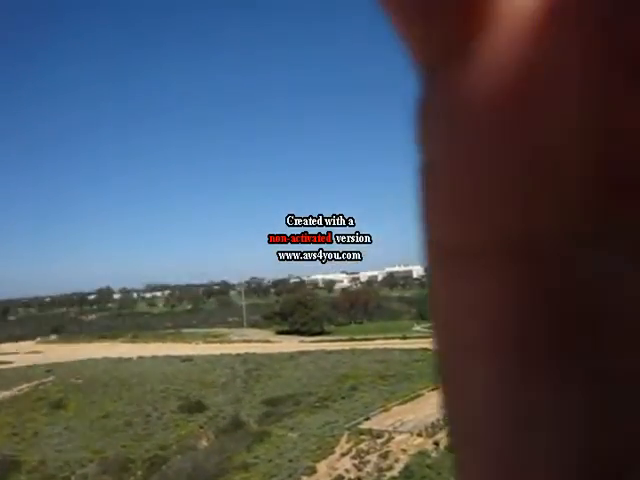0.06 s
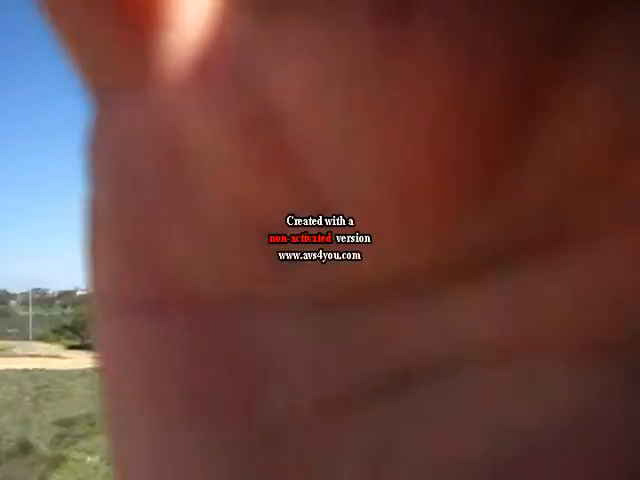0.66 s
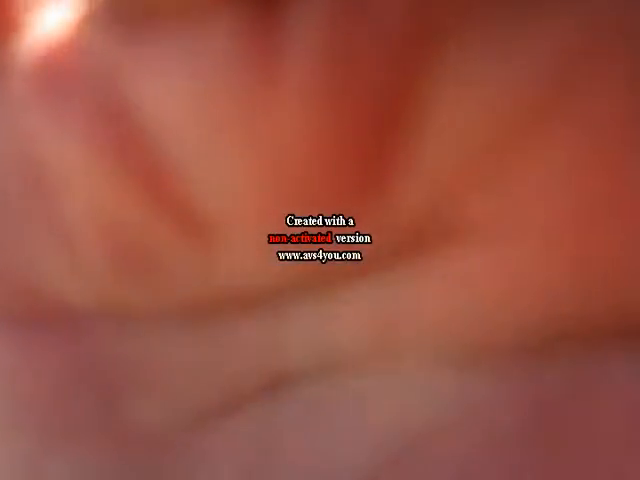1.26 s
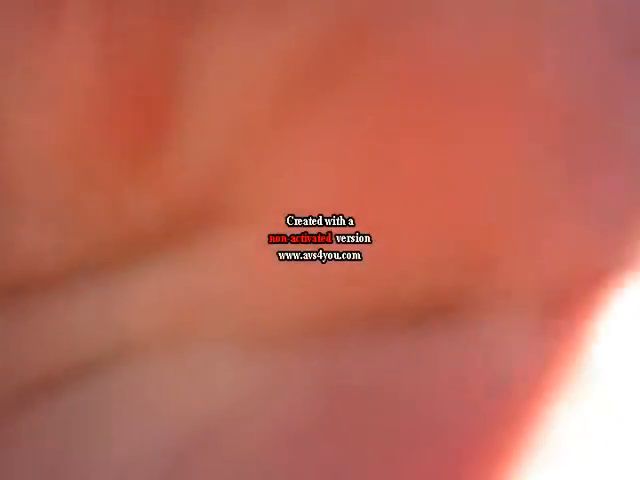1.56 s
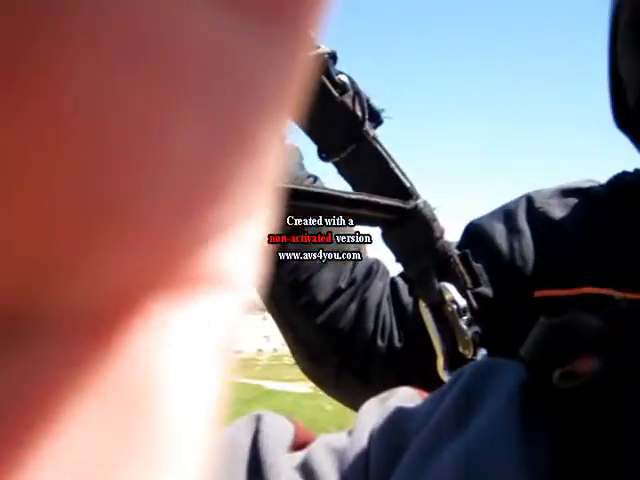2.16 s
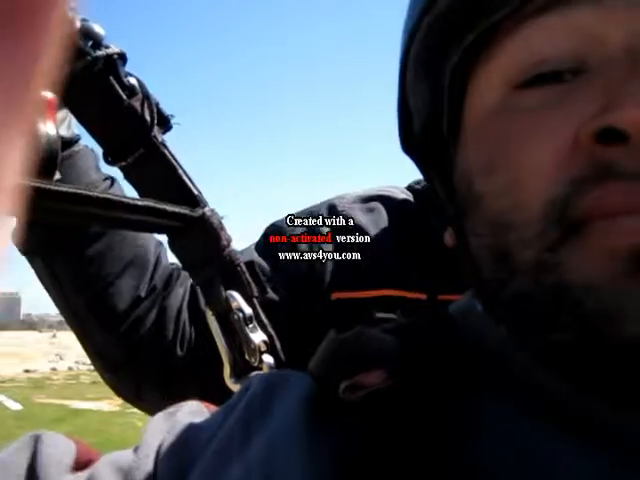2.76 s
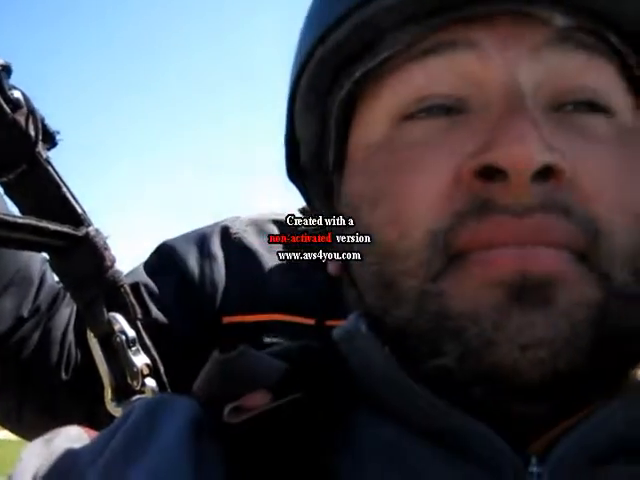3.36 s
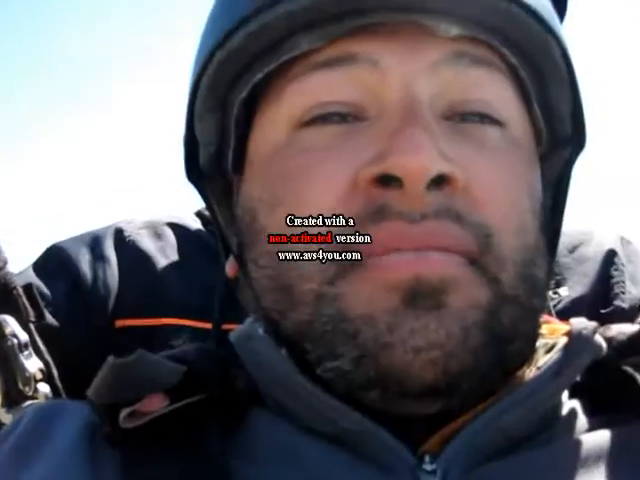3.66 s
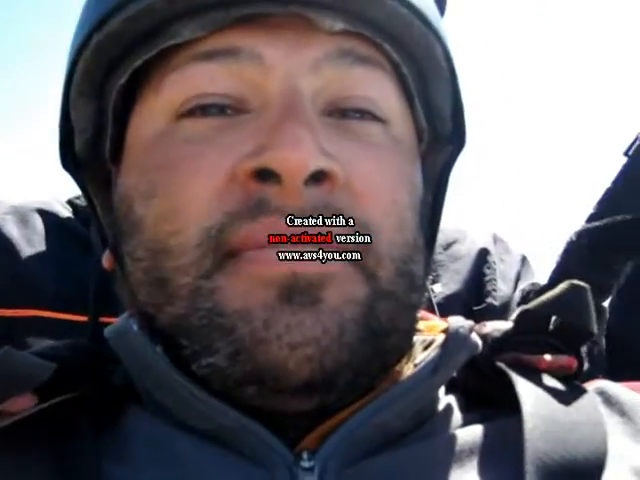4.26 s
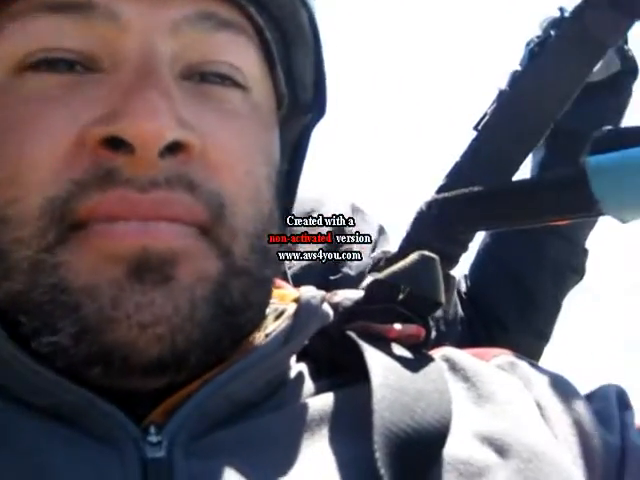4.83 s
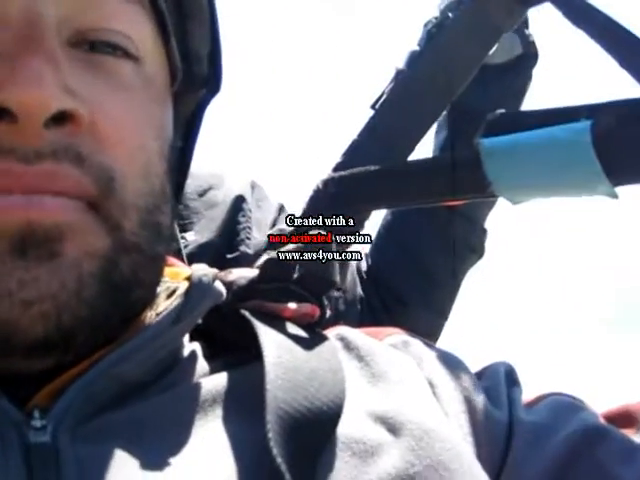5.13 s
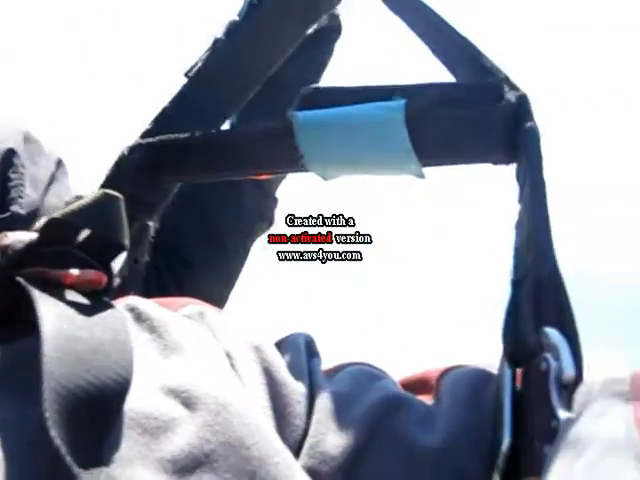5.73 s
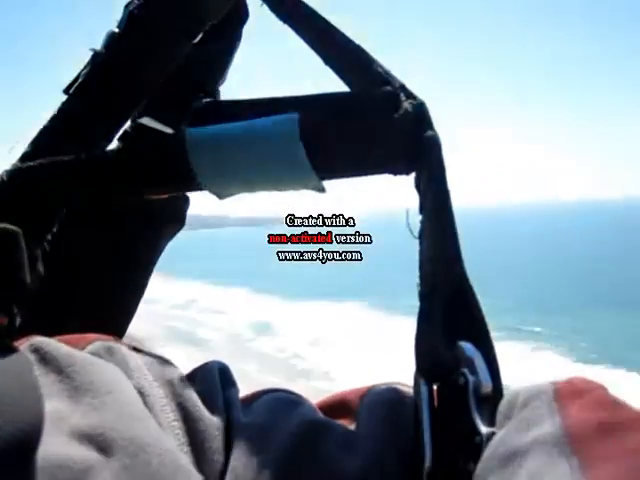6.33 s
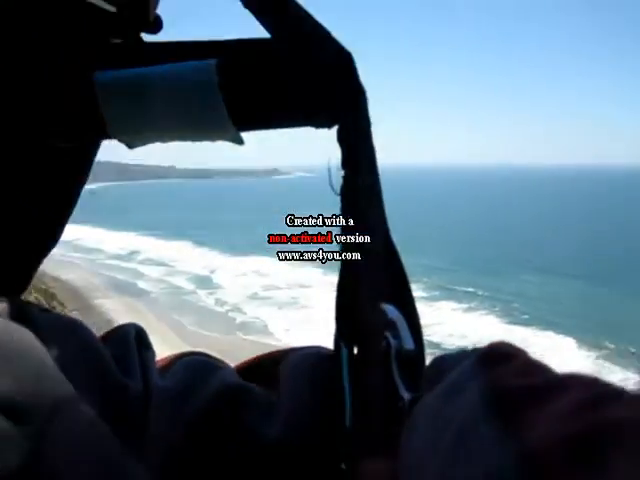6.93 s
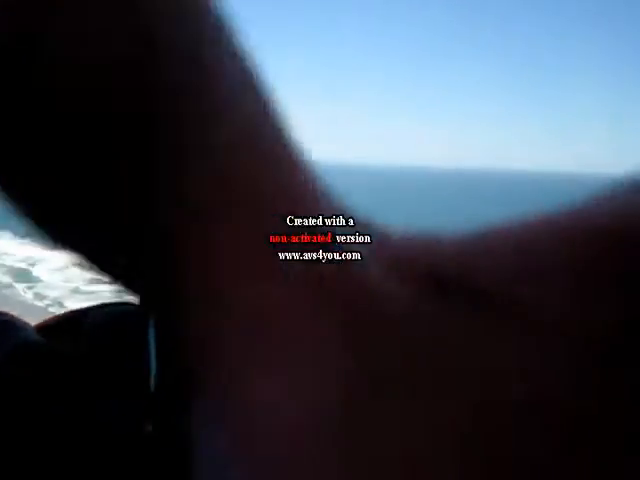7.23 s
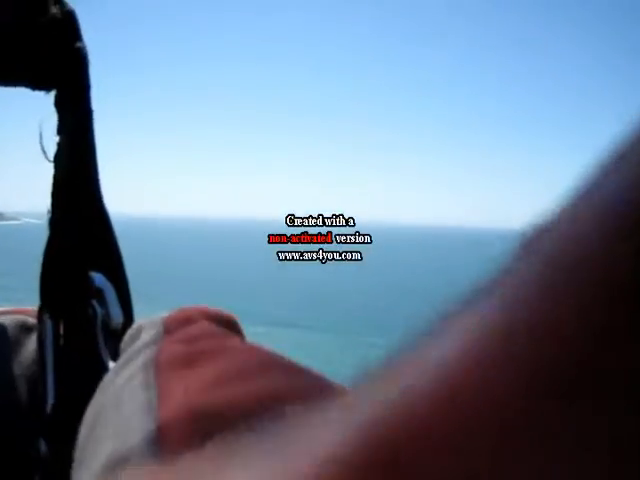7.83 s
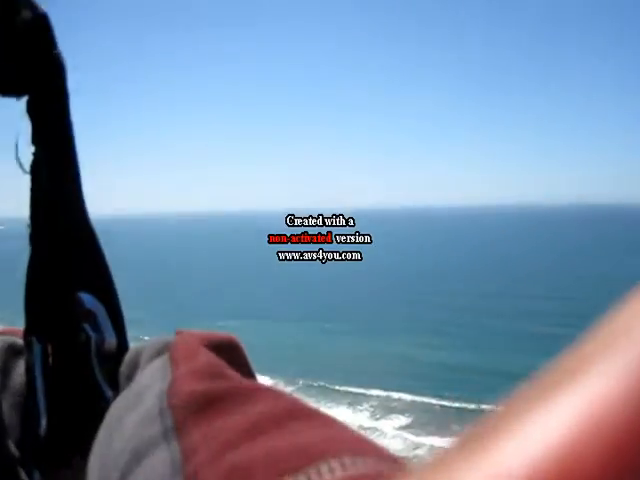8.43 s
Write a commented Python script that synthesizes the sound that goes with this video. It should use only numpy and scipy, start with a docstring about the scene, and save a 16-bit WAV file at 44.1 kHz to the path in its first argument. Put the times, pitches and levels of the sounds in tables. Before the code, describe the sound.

High over the shore, air tears across the microphone of a camera held on a paraglider, roaring, crackling and thumping over a deep rumble. Midway the rush eases into ragged puffs and dull thuds, uncovering a soft airy hiss and two tiny harness clicks. The wind surges, dips and settles back into a solid, even roar. The hardest gusts make the level duck for an instant and rasp slightly.

```python
"""On a paraglider above a coast, wind buffets the microphone of a hand-held camera.
Head-on, air tears across the mic port in a dense roar, and vortex cores crackle and pop in it.
Turned away, the roar breaks into separate gusts over a low buffeting, a smooth hiss of air along the
camera body comes through, and the harness ticks twice. The loudest puffs overload the input:
the level ducks and the peaks rasp faintly."""
import sys
import numpy as np
from scipy import signal
from scipy.fft import rfft, irfft, next_fast_len
from scipy.io import wavfile
from scipy.ndimage import uniform_filter1d

SR = 44100
rng = np.random.default_rng(int(sys.argv[2]) if len(sys.argv) > 2 else 0)


def dump(signal):
    """Clip the signal to [-1, 1] and save it as 16-bit WAV at the path in sys.argv[1]."""
    limited = np.clip(np.atleast_2d(signal).T, -1, 1)
    pcm = np.round(limited * 32767).astype(np.int16)
    wavfile.write(sys.argv[1], SR, pcm)


N = 378819
TIME = np.arange(N) / SR

# Levels are relative: each layer has its own trim. Brightness is treble against body.
# airflow across the port as the camera turns: (time [s], level [dB], brightness [dB])
AIRFLOW = [(0.02, -36.5, -24), (0.06, -21, -16.5), (0.4, -21, -13), (0.52, -18.5, -8.5),
           (0.78, -22.5, -12.5), (1.24, -21, -8.5), (1.35, -23.5, -13), (1.62, -22.5, -12), (2.2, -27, -17),
           (2.55, -29, -15), (2.66, -37.5, -19.5), (3.05, -33, -22.5), (3.74, -30, -24.5),
           (3.83, -43, -10.5), (3.97, -36.5, -17), (5.35, -28, -23), (5.52, -31, -20.5),
           (6.1, -34.5, -20.5), (6.24, -22.5, -9), (6.46, -23.5, -12.5), (6.6, -33.5, -20.5),
           (6.84, -30.5, -13), (6.97, -20.5, -7.5), (8.59, -22, -8)]
# how broken-up the flow is: (time [s], eddy swing [dB])
RAGGEDNESS = [(0, 3.5), (1.3, 2.5), (1.9, 7.5), (2.7, 10), (4.0, 10), (5.2, 7.5), (6.05, 11), (6.3, 5),
              (6.65, 8.5), (7.0, -1), (8.59, 1.5)]
# tone of the turbulence: (frequency [Hz], level [dB])
ROAR_EQ = [(100, -19), (220, -1.5), (400, -1), (650, -3.5), (1000, -8), (1450, -15.5), (2050, -25),
           (2900, -30.5), (3500, -36), (4200, -48.5), (5500, -63), (7000, -83)]
# tone of one vortex core: (frequency [Hz], level [dB])
VORTEX_EQ = [(30, -13.5), (120, 4.5), (500, 0), (1000, -1), (1450, -6), (2050, -18), (2900, -20.5),
             (3600, -27.5), (4300, -35), (5500, -48), (7000, -78.5)]
# faders for the low pressure noise: (time [s], buffeting [dB], deep rumble [dB])
LOW_END_FADERS = [(0.0, -31.5, -31), (0.6, -23, -28.5), (1.7, -23.5, -24), (2.3, -19.5, -23),
                  (3.05, -26, -22), (3.75, -21, -25.5), (4.2, -20, -23), (4.55, -21.5, -28.5),
                  (4.85, -21.5, -22), (5.17, -24, -30), (5.45, -20, -18), (5.7, -18, -29), (6.05, -19, -24),
                  (6.45, -22, -26), (6.78, -16, -29.5), (7.1, -23, -30.5), (8.59, -21.5, -29)]
# tone of the buffeting: (frequency [Hz], level [dB])
BUFFET_EQ = [(40, -33), (75, -6), (105, -2), (170, -4.5), (260, -9), (370, -14.5), (600, -47), (1500, -88)]
# tone of the rumble beneath it: (frequency [Hz], level [dB])
RUMBLE_EQ = [(8, -14), (22, 13), (38, 19), (65, 18.5), (100, 13.5), (250, -61)]
# fader for smooth air along the camera body: (time [s], level [dB])
HISS_FADER = [(0.02, -50), (0.12, -68.5), (1.2, -68), (2.73, -63), (2.79, -52), (3.1, -53), (3.18, -45),
              (3.27, -55.5), (3.38, -49), (3.74, -49.5), (3.88, -58.5), (3.99, -49.5), (4.55, -54.5),
              (4.62, -44), (4.82, -50.5), (5.04, -47.5), (5.46, -49), (5.49, -57.5), (6.55, -65.5),
              (7.1, -64), (8.59, -61)]
# tone of the hiss and ticks, with the recorder's notch at 6.3 kHz and faint treble above it:
# (frequency [Hz], level [dB])
HISS_EQ = [(500, -22.5), (1550, 9.5), (2000, 5), (2850, 11), (4100, 2), (5400, 5), (5800, -5), (6300, -23),
           (7500, -11.5), (9200, -17), (10200, -21), (11300, -21.5), (12300, -31.5)]
# strongest eddies to hit the port: (time [s], nominal length [s], level [dB], brightness [dB])
GUST_CUES = [(0.067, 0.029, -7.5, -11), (0.28, 0.035, -17.5, -6.5), (0.549, 0.046, -20.5, -6.5),
             (1.097, 0.023, -17, -4), (1.201, 0.04, -20.5, -6), (1.422, 0.0058, -11.5, -9.5),
             (1.884, 0.0074, -10.5, -12.5), (1.938, 0.014, -16.5, -11.5), (2.034, 0.0061, -11, -8),
             (2.062, 0.0085, -19.5, -7), (2.362, 0.038, -22.5, -7.5), (2.592, 0.0072, -10.5, -13),
             (2.702, 0.029, -21, -16.5), (2.813, 0.021, -18.5, -24), (2.956, 0.0086, -10, -17),
             (3.06, 0.023, -21.5, -14), (3.095, 0.013, -10.5, -13), (3.218, 0.014, -11, -11),
             (3.255, 0.015, -19.5, -13.5), (3.334, 0.0088, -16, -27), (3.413, 0.018, -17, -21),
             (3.502, 0.018, -20, -21), (3.644, 0.0076, -22, -19), (3.762, 0.011, -8, -14.5),
             (3.873, 0.0038, -14, -26), (3.983, 0.034, -17.5, -19.5), (4.145, 0.0053, -16, -16),
             (4.212, 0.0057, -14, -30), (4.315, 0.016, -7.5, -13.5), (4.371, 0.025, -19, -16),
             (4.435, 0.019, -19.5, -15.5), (4.507, 0.013, -12, -18), (4.565, 0.018, -19, -20.5),
             (4.735, 0.028, -19.5, -15), (4.811, 0.0099, -12, -18), (5.145, 0.019, -18.5, -17),
             (5.327, 0.012, -15.5, -15.5), (5.554, 0.0053, -15, -14.5), (5.584, 0.0077, -10, -12.5),
             (5.615, 0.031, -16, -11), (5.656, 0.0068, -11, -10.5), (5.842, 0.02, -21, -24),
             (5.943, 0.0058, -19.5, -14), (6.189, 0.022, -18.5, -9.5), (6.532, 0.0042, -11, -14),
             (6.767, 0.0053, -15.5, -9.5), (6.851, 0.023, -18, -28), (8.333, 0.016, -22, -3)]
# tone of one gust: (frequency [Hz], level [dB])
GUST_EQ = [(40, -13), (130, -2), (400, -2.5), (700, -2), (1000, -4.5), (1450, -12), (2050, -23),
           (2900, -26.5), (4000, -42), (5500, -50.5), (7000, -106)]
# sharpest vortex cores to cross the port: (time [s], peak level [dB], brightness [dB])
POP_CUES = [(0.072, 7, -16), (0.128, 0, -20), (0.16, 7, -18), (0.186, -3, -44), (0.392, 0, -17.5),
            (1.16, -2.5, -13), (1.268, 2, -12.5), (1.445, -3, -15.5), (1.972, 9.5, -19.5),
            (2.104, -0.5, -18), (2.606, 2.5, -29), (2.755, -12, -31), (2.897, -2, -36), (4.31, -1, -30),
            (4.439, 1, -43), (4.74, 3, -26), (4.809, -1, -17), (5.755, -4, -14.5), (5.798, -5, -16.5),
            (5.906, -3, -16), (6.155, -8, -36), (6.438, 0, -13), (6.472, -5, -26), (6.605, -9.5, -13),
            (6.742, -5.5, -13.5), (6.792, -6, -15), (7.184, -6, -12), (7.881, 1.5, -26)]
# small ticks of the harness: (time [s], level [dB])
TICK_CUES = [(3.627, -21.5), (4.154, -27)]
# tone of the overload rasp: (frequency [Hz], level [dB])
RASP_EQ = [(3000, -1.5), (5300, -17), (6300, -20), (7300, -8), (9200, -3), (10200, -12), (11300, -6.5),
           (12400, -19.5)]


def amp(db):
    """Decibels to gain."""
    return 10 ** (np.asarray(db) / 20)


def unit(x):
    """Normalises to rms 1."""
    return x / np.sqrt(np.mean(x ** 2) + 1e-20)


def automation(rows):
    """One per-sample curve for each column after the time."""
    times, *columns = np.transpose(rows)
    return [np.interp(TIME, times, column) for column in columns]


def eq_db(points, hz):
    """Gain of an EQ curve, its points joined on a log-frequency axis."""
    point_hz, db = np.transpose(points)
    return np.interp(np.log(hz + 1), np.log(point_hz + 1), db)


def treble_share(hz):
    """How strongly each frequency follows the brightness: small eddies need fast air."""
    return eq_db([(250, -0.66), (500, -0.4), (1400, 0.71), (2800, 2.0), (5000, 2.1)], hz)


def colour(x, eq, tilt_db=0):
    """Applies an EQ curve, tilted across the mids."""
    size = next_fast_len(len(x))
    hz = np.fft.rfftfreq(size, 1 / SR)
    gain = amp(eq_db(eq, hz) + tilt_db * treble_share(hz))
    return irfft(rfft(x, size) * gain, size)[:len(x)]


def brighten(x, tilt_db):
    """A moving tilt EQ in six octave bands."""
    size = next_fast_len(N)
    hz, spectrum = np.fft.rfftfreq(size, 1 / SR), rfft(x, size)
    centres_hz = np.geomspace(200, 6400, 6)
    out = np.zeros(N)
    for centre, share in zip(centres_hz, np.eye(len(centres_hz))):
        band = irfft(spectrum * np.interp(hz, centres_hz, share), size)[:N]
        out += band * amp(tilt_db * treble_share(centre))
    return out


def wander(rate_hz):
    """A smooth random modulator of rms 1, rolled off above rate_hz."""
    size = next_fast_len(N)
    hz = np.fft.rfftfreq(size, 1 / SR)
    spectrum = rfft(rng.standard_normal(size)) / (1 + (hz / rate_hz) ** 4)
    return unit(irfft(spectrum, size)[:N])


def add(mix, at_s, sound):
    """Drops a sound into the mix, starting at at_s."""
    start = max(round(at_s * SR), 0)
    part = mix[start:start + len(sound)]
    part += sound[:len(part)]


def roar(eddies, trim_db=1.78, neutral_bright_db=-10, flutter_db=3.4, eddy_tilt=0.49, flutter_tilt_db=1.5):
    """Turbulence at the port: each eddy makes it louder and brighter, with a fine flutter inside."""
    flow_db, bright_db = automation(AIRFLOW)
    ragged_db, = automation(RAGGEDNESS)
    eddies_db = ragged_db * eddies
    flutter = 2 * np.tanh(wander(rate_hz=300) / 2)
    swing_db = eddies_db + flutter_db * flutter
    swing_db -= 10 * np.log10(uniform_filter1d(amp(swing_db) ** 2, SR // 10))  # only bunch the energy
    tilt_db = bright_db - neutral_bright_db + eddy_tilt * eddies_db + flutter_tilt_db * (flutter - 1)
    air = unit(colour(rng.standard_normal(N), ROAR_EQ))
    return brighten(air, tilt_db) * amp(trim_db + flow_db + swing_db)


def vortex_crackle(per_s=190, size_db=8, trim_db=-7, neutral_bright_db=-8, ragged_share=0.18):
    """Countless small vortex cores: they crackle in fast flow and thud dully in slack, ragged flow."""
    flow_db, bright_db = automation(AIRFLOW)
    ragged_db, = automation(RAGGEDNESS)
    triggers = rng.random(N) < per_s / SR
    kicks = triggers * amp(size_db * np.minimum(rng.exponential(1, N), 2))
    suction = brighten(-unit(colour(kicks, VORTEX_EQ)), bright_db - neutral_bright_db)
    lift_db = ragged_share * (ragged_db - 3)  # no lift at the usual 3 dB of swing
    return suction * amp(trim_db + flow_db + lift_db)


def throb(eq, swing_db):
    """Lumpy pressure noise, levelled over a tenth of a second."""
    lumps = colour(rng.standard_normal(N), eq) * amp(swing_db)
    return lumps / np.sqrt(uniform_filter1d(lumps ** 2, SR // 10))


def buffet(eddies, body_trim_db=-0.1, rumble_trim_db=-1, lumpy_share=0.35, rumble_swing_db=2):
    """Large eddies push on the diaphragm; in broken-up flow they come in lumps."""
    body_db, rumble_db = automation(LOW_END_FADERS)
    ragged_db, = automation(RAGGEDNESS)
    body = throb(BUFFET_EQ, lumpy_share * ragged_db * eddies)
    rumble = throb(RUMBLE_EQ, rumble_swing_db * wander(rate_hz=23))
    return amp(body_db + body_trim_db) * body + amp(rumble_db + rumble_trim_db) * rumble


def body_hiss(trim_db=6.5, flicker_db=2.2, sway_db=0.9):
    """Attached flow hisses along the camera body, its level flickering slightly."""
    hiss_db, = automation(HISS_FADER)
    unsteady_db = flicker_db * wander(rate_hz=44) + sway_db * wander(rate_hz=16)
    hiss = unit(colour(rng.standard_normal(N), HISS_EQ))
    return hiss * amp(trim_db + hiss_db + unsteady_db)


def gusts(neutral_bright_db=-9, spread=0.43, grain_db=6):
    """Each strong eddy lands as a puff: a short, grainy clump of pressure kicks."""
    out, t = np.zeros(N), np.arange(-2048, 2048) / SR
    grain = amp(grain_db * wander(rate_hz=350))
    for at_s, length_s, db, bright_db in GUST_CUES:
        swell = np.exp(-.5 * (t / (spread * length_s)) ** 2)
        kicks = rng.standard_normal(len(t)) * swell * grain[round(at_s * SR):][:len(t)]
        puff = colour(kicks, GUST_EQ, bright_db - neutral_bright_db)
        puff *= np.sqrt(length_s * SR / np.sum(puff ** 2))  # the energy of rms 1 held for length_s
        add(out, at_s + t[0], amp(db) * puff)
    return out


def vortex_pops(trim_db=-2, neutral_bright_db=-15, wake_gain=0.064, wake_decay_s=0.0074):
    """A vortex core is a spike of suction with a brief noisy wake; small cores sound brighter."""
    out, t = np.zeros(N), np.arange(-512, 512) / SR
    for at_s, db, bright_db in POP_CUES:
        wake = wake_gain * rng.standard_normal(len(t)) * (t > 0) * np.exp(-abs(t) / wake_decay_s)
        spike = t == 0
        pop = colour(wake - spike, VORTEX_EQ, bright_db - neutral_bright_db) * np.hanning(len(t))
        add(out, at_s + t[0], amp(trim_db + db) * pop / abs(pop).max())
    return out


def harness_ticks(trim_db=-4, decay_s=0.00095):
    """Dry little clicks of the harness: tiny noise bursts with the same tone as the hiss."""
    out, t = np.zeros(N), np.arange(-512, 1024) / SR
    for at_s, db in TICK_CUES:
        burst = rng.standard_normal(len(t)) * (t >= 0) * np.exp(-abs(t) / decay_s)
        click = colour(burst, HISS_EQ)
        add(out, at_s + t[0], amp(db + trim_db) * click / click.std() / np.pi)
    return out


def duck(x, threshold_db=-15.5, strength=0.51, detector_fall_db_per_s=150):
    """Gain control: ducks at once when a puff is too loud, and soon recovers."""
    power_db = 10 * np.log10(abs(uniform_filter1d(x ** 2, size=400)) + 1e-12)
    fall_db = TIME * detector_fall_db_per_s
    held_db = np.maximum.accumulate(power_db + fall_db) - fall_db
    over_db = np.maximum(held_db - threshold_db, 0)
    return x / amp(strength * uniform_filter1d(over_db, size=100))


def scene():
    """The mono wind mix; one train of eddies drives both the roar and the buffeting."""
    eddies = 2 * np.tanh(wander(rate_hz=70) / 2)
    turbulence = roar(eddies) + gusts() + vortex_pops() + vortex_crackle() + buffet(eddies)
    return (turbulence + body_hiss() + harness_ticks())[None]


def record(dry, knee=0.48, headroom=0.24, rasp_from=0.19, rasp_cap=0.25, rasp_db=-31.5, top_hz=12300):
    """The input chain: gain control, soft clipping, a faint rasp on the peaks, then a steep high cut."""
    ducked = duck(dry[0])
    over = np.sign(ducked) * np.maximum(abs(ducked) - knee, 0)
    shaved = over - headroom * np.tanh(over / headroom)
    keep_dark = signal.firwin(63, cutoff=3500, fs=SR)  # takes the fizz off the clipping
    rounded = ducked - signal.oaconvolve(shaved, keep_dark, "same")
    rasp_drive = np.clip(abs(rounded) - rasp_from, 0, rasp_cap)
    rasp = colour(rasp_drive * rng.standard_normal(N), RASP_EQ)
    high_cut = signal.firwin(511, top_hz, window=("kaiser", 9), fs=SR)
    return signal.oaconvolve(rounded + amp(rasp_db) * rasp, high_cut, "same")[None]


dry = scene()
out = record(dry)
dump(out)
```